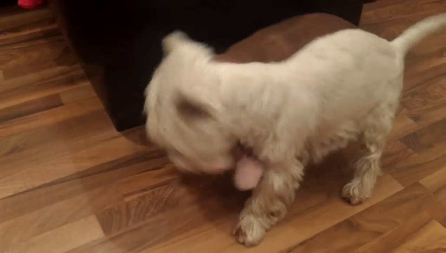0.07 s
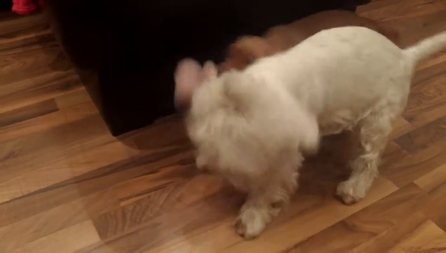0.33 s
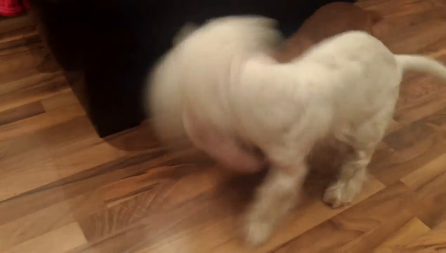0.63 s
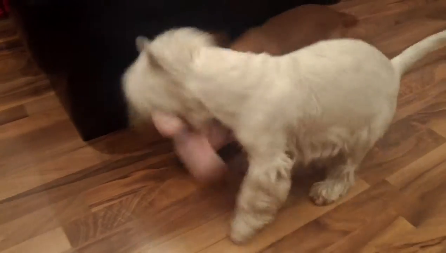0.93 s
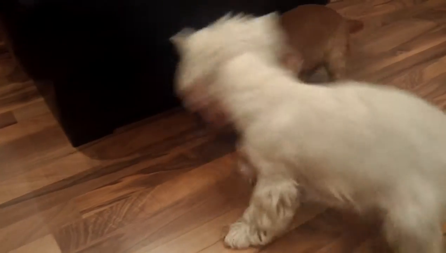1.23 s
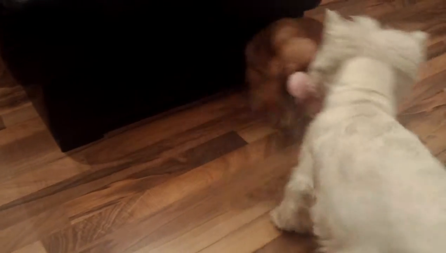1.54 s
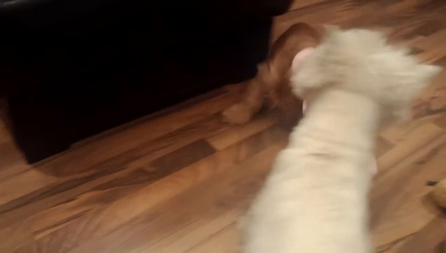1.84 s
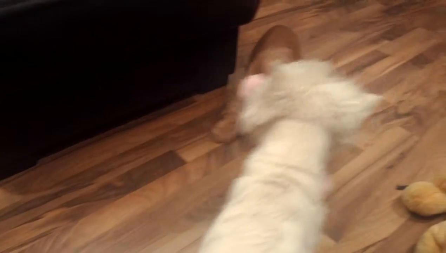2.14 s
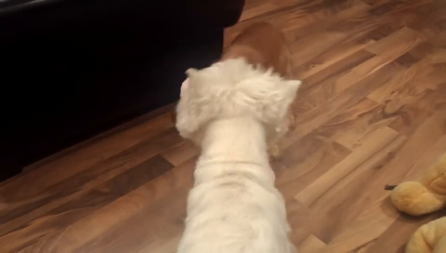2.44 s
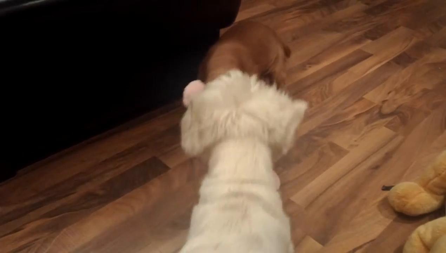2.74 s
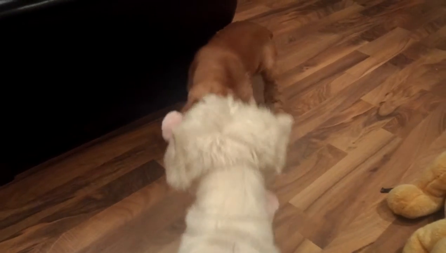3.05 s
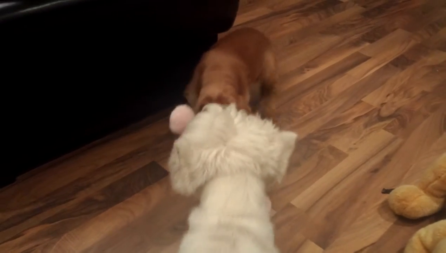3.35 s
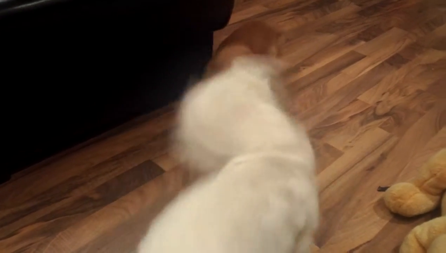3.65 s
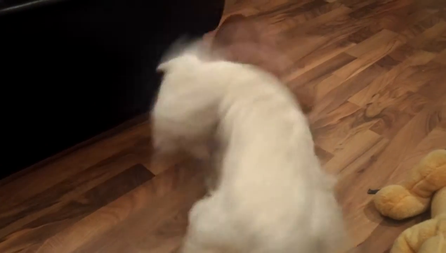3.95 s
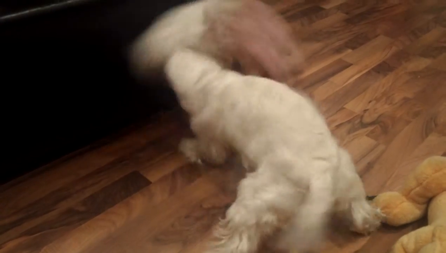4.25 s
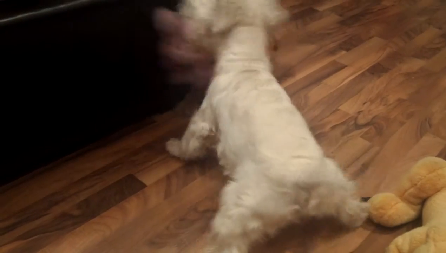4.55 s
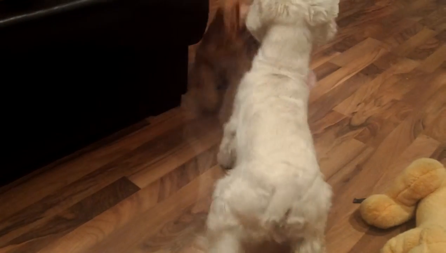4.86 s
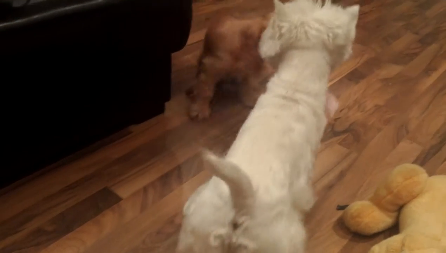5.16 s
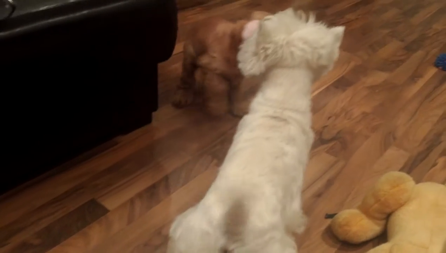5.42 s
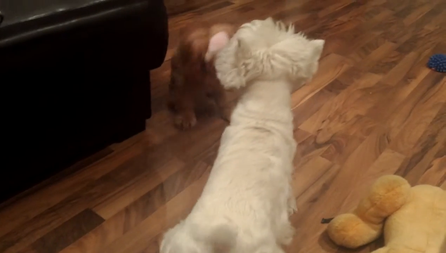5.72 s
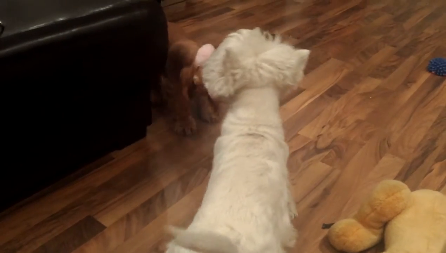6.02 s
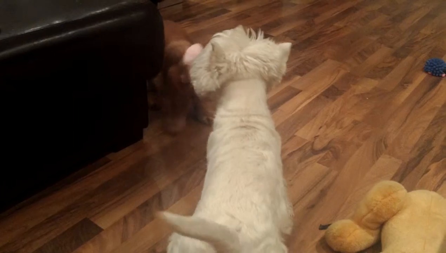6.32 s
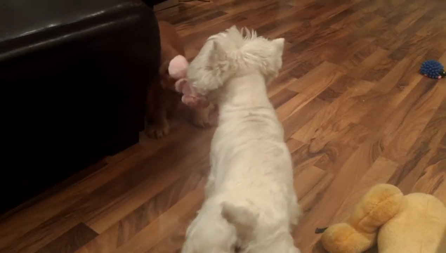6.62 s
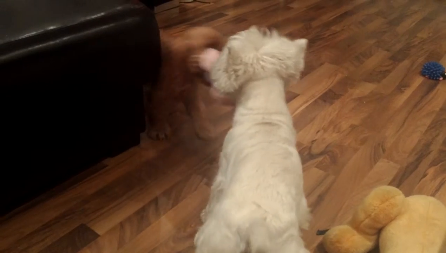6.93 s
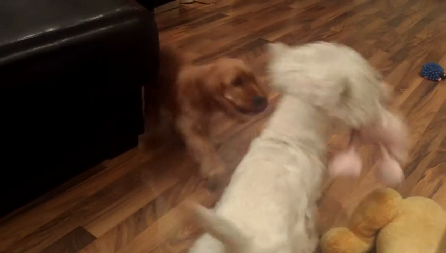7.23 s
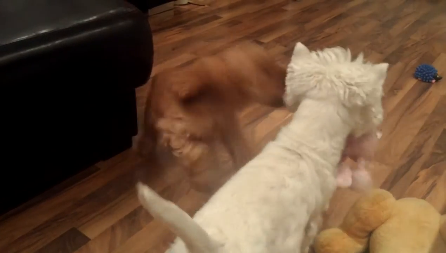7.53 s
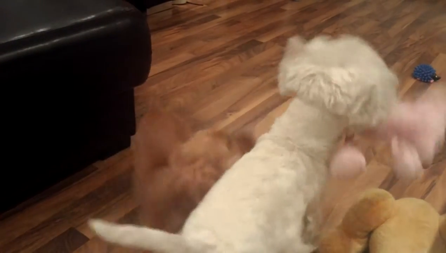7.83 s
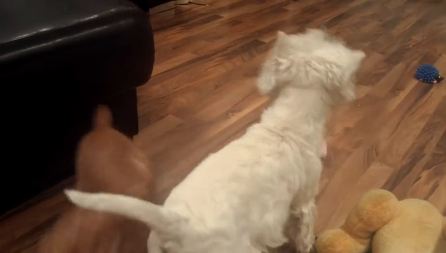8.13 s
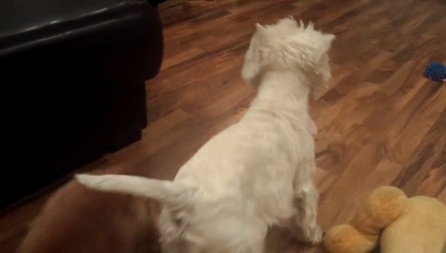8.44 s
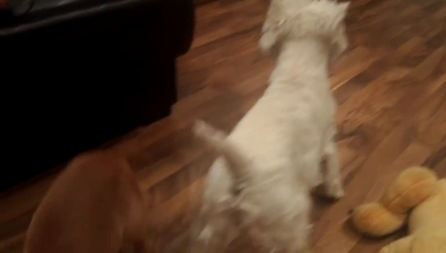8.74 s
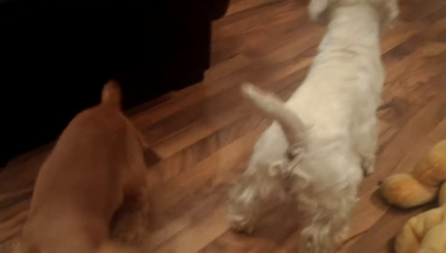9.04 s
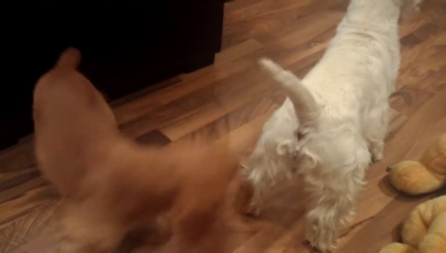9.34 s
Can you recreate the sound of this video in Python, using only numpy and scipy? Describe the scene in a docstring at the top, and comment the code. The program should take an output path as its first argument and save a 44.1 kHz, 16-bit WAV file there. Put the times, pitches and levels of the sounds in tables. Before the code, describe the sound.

Rough, wavering growls come from two small dogs play-fighting close to the microphone in a slightly echoing room. Claws tick on the laminate floor as the growling builds to snarls and a sharp bark midway, with skids and a thump. A steady low growl returns, then weaker growls trail off among paw scuffs, clicks and soft knocks, over faint background noise.

```python
"""Two small dogs tugging at a toy

Long growls break into snarls and a sharp bark: uneven vocal-fold pulses ring chest, throat and mouth,
the soft palate flutters, the nose whistles. Claws click on the laminate floor, paws and the plush toy
skid, bodies bump the boards. The bare living room rings behind it all, over faint steady noise."""
import sys
import numpy as np
from scipy import signal
from scipy.fft import rfft, irfft, next_fast_len
from scipy.io import wavfile
from scipy.ndimage import map_coordinates

SR = 44100
rng = np.random.default_rng(int(sys.argv[2]) if len(sys.argv) > 2 else 0)


def store_wav(level_fs):
    """Save 16-bit WAV to argv[1]."""
    pcm = np.round(np.clip(np.atleast_2d(level_fs), -1, 1) * 32767)
    wavfile.write(sys.argv[1], SR, pcm.T.astype(np.int16))


N = 413658

# Room decay (frequency [Hz], t60 [s])
ROOM_T60 = [(100, 0.27), (300, 0.56), (800, 0.46), (2000, 0.56), (4500, 0.63), (9000, 0.48), (14000, 0.093)]
# Spectral shapes (frequency [Hz], gain [dB])
AIR_SPECTRUM = [(15, -27.5), (25, -28), (33, -7), (66, -21), (167, -14.5), (237, -19.5), (427, -13),
                (604, -12), (1210, -11), (1460, -16), (3350, -18), (3830, -18), (4150, -19), (11800, -28),
                (15000, -37.5)]  # room background
KNOCK_SPECTRUM = [(60, -46), (150, -34), (260, -11), (420, -10.5), (560, 0.5), (730, 3), (950, -9),
                  (1350, -5.5), (2200, -11.5), (4000, -26), (9000, -37.5)]  # board under a padded blow
BOOM_SPECTRUM = [(20, -59.5), (45, -30.5), (72, -1), (88, -5.5), (120, -14.5), (220, -14.5), (400, -38),
                 (1200, -49)]  # whole floor
CLICK_SPECTRUM = [(2000, -33.5), (4000, -10.5), (6000, -13), (8000, -4.5), (9600, -5.5), (10600, -18.5),
                  (14000, -26)]  # claw
SNAP_SPECTRUM = [(500, -38.5), (3000, 13.5), (7000, -36), (11000, 2.5), (14000, 8)]  # hard claw tip
RAP_SPECTRUM = [(150, -38.5), (400, -5.5), (650, -3.5), (1100, -6.5), (1900, -4), (3000, -7), (4500, -6),
                (6500, -10.5), (10000, -38.5)]  # board under a claw
RASP_SPECTRUM = [(150, -21), (450, -21), (700, -8.5), (1300, -0.5), (2700, -6), (3500, -14), (6000, -21.5),
                 (9000, -14.5), (10800, -28), (14000, -31)]  # breath in a bark
CHEST_SPECTRUM = [(50, -43), (95, -18), (135, -11.5), (200, -3), (290, -3), (380, -5.5), (480, -7),
                  (600, -15), (800, -8), (1500, -58.5)]  # chest tone
NOSE_SPECTRUM = [(2500, -21), (4000, -12.5), (6200, -10.5), (7500, -6.5), (8400, -8.5), (9600, -0.5),
                 (10400, -18), (14000, -35)]  # nasal hiss

# Event levels are relative within each layer.
# Paws and bodies landing (time [s], knock [dB], boom [dB], boom t60 [s])
BUMPS = [(.738, -30, -72, .1), (0.978, -39.5, -65, 0.13), (3.805, -28, -59, 0.2), (3.969, -27, -49, 0.073),
         (4.371, -17.5, -29, 0.092), (4.392, -33, -62, 0.21), (4.581, -33, -50, 0.16),
         (4.787, -28, -63, 0.22), (5.068, -44.5, -67.5, 0.3), (6.215, -65, -64, 0.55),
         (7.682, -34, -80, .1), (7.755, -32, -69, .1), (8.292, -28.5, -60, .1), (8.419, -43, -66, .4),
         (8.46, -35.5, -69, 0.27), (8.58, -48.5, -73, 0.15), (8.635, -33.5, -75, .1),
         (8.905, -33, -68, 0.18), (9.06, -59, -68, 0.058)]
# Paws and toy sliding (time [s], length [s], level [dB], centre [Hz], half-width [octaves])
SCUFFS = [(0.416, 0.13, -52, 3000, .6), (0.55, 0.076, -48, 8950, 0.63), (0.69, 0.031, -36.5, 7000, 1),
          (1.964, 0.043, -37, 4030, 0.68), (3.707, 0.095, -39, 6000, 0.99),
          (3.895, 0.082, -40.5, 960, 0.41), (3.961, 0.03, -30, 7700, 0.49), (4.122, 0.06, -33, 6700, .9),
          (4.162, 0.028, -31, 3520, 0.88), (4.249, 0.11, -36.5, 4980, .79), (4.33, .054, -56, 8540, 0.33),
          (4.603, 0.096, -47, 5750, 1), (4.743, 0.033, -40, 4500, 1), (7.23, 0.073, -45, 1900, 0.79),
          (7.434, 0.059, -46, 1980, 0.55), (7.589, 0.0087, -39, 1540, 0.29), (7.737, 0.11, -44.5, 2880, 1),
          (7.939, 0.35, -52.5, 2100, 0.36), (8.337, 0.048, -37, 1740, 0.22),
          (8.64, 0.069, -41.5, 9000, 0.96), (8.756, 0.073, -43, 1650, 0.23),
          (8.843, 0.049, -40.5, 2040, 0.29)]
# Claw strikes (time [s], level [dB], rap trim [dB], snap trim [dB])
CLAWS = [(.737, -13, -17.5, -28), (0.9506, -24, -23, -28), (1.0459, -17.5, -14, -7),
         (1.0568, -25.5, -8.5, -26), (1.2182, -14.5, -17, -22.5), (1.2253, -23.5, -9.5, -23),
         (1.486, -14.5, -16.5, -32), (1.4984, -15.5, -10.5, -29), (1.8761, -30.5, -14, -28),
         (1.9581, -21, -12.5, -34), (3.8031, -10.5, -14, -4), (3.9705, -24.5, -8, -25),
         (4.2088, -10.5, -16.5, -30), (4.2917, -6, -35, -11), (4.2963, -18, -11, -9),
         (4.7258, -30, -10.5, -20), (4.7837, -24, -2, -30), (5.0643, -22.5, -26, -34),
         (7.2281, -32.5, -15, -25), (7.2467, -28.5, -23, -30), (7.4054, -26, -17.5, -56),
         (7.5675, -41, -16, -33), (7.6789, -20.5, -24, -15), (7.753, -29.5, -12, -24),
         (7.9482, -37, -5.5, -34), (8.0695, -38, -9, -5), (8.395, -32, -10.5, -30), (8.545, -35.5, -9, -33),
         (8.6353, -17, -14.5, 1), (9.055, -33.5, -37, -24.5), (9.2222, -46.5, -45.5, -28.5),
         (9.3399, -41.5, -15, -20)]
# Snarls and barks (time [s], length [s], level [dB], throat [Hz], roughness [0-1], rasp [dB])
BARKS = [(0.399, 0.022, -35, 1510, 0.8, -13), (.63, 0.014, -29.5, 1080, 0.72, -7),
         (0.712, 0.02, -32, 1090, .54, .5), (2.588, 0.028, -29, 1286, 0.3, -24),
         (2.628, 0.0077, -25.5, 1260, 0.56, -12.5), (3.712, 0.049, -23.5, 1183, 0.35, -32),
         (3.726, 0.057, -26, 831, 0.49, -6.5), (4.068, 0.022, -28, 1330, 0.62, 0.5),
         (4.11, 0.052, -17.5, 978, 0.36, -9), (4.237, .016, -16.5, 844, .15, -14),
         (4.257, 0.045, -23, 790, 0.7, -5), (4.812, .058, -25, 1670, .6, 5.5),
         (4.82, 0.07, -37.5, 2015, 0.67, 14), (5.9136, 0.0058, -21.5, 1469, 0.43, -23),
         (7.08, 0.048, -42, 1673, 0.56, -7)]
# One curve per growl (time [s], pitch [Hz], effort [dB], throat [Hz], mouth opening [0-1])
GROWLS = [
    [(0, 182.3, -39.5, 918, .3), (.05, 176, -54, 777, 0.67), (.11, 149.2, -58, 785, 1),
     (.15, 149, -74, 850, 0.5)],
    [(.235, 195, -68, 980, 0.86), (.275, 204.4, -51.5, 996, 0.92), (.36, 229.3, -46, 1125, .7),
     (.41, 245.6, -45, 928, 0.9), (.48, 276, -38.5, 998, 0.43), (.595, 251, -36.5, 848, 0.7),
     (.65, 252.7, -52, 1040, 1), (.68, 256, -60, 990, .7)],
    [(.98, 207.1, -52, 870, .2), (1.08, 262, -31, 840, 0.2), (1.15, 222, -40.5, 840, .05),
     (1.24, 200, -39, 852, 0.6), (1.34, 225.9, -42, 1138, 0.72), (1.62, 223, -44, 1318, 0.63),
     (1.82, 217, -48.5, 1040, .1), (1.97, 206.9, -46.5, 1005, 0.97), (2.2, 169.1, -37.5, 1175, 0.62),
     (2.42, 178.4, -40.5, 1126, 0.86), (2.64, 195.8, -49.5, 1296, 0.92), (2.88, 164.9, -42, 979, 0.85),
     (3.05, 153, -43.5, 1050, 0.85), (3.15, 152.1, -43, 1003, .05), (3.28, 149.1, -40.5, 1035, 0.31),
     (3.34, 150.8, -40.5, 1062, 0.9), (3.52, 160, -36.5, 1039, 0.76), (3.67, 178, -40, 1083, .68),
     (3.74, 260.4, -31, 1147, 1), (3.8, 258, -49, 986, 0.37)],
    [(4.03, 234.6, -36, 1042, 0.2), (4.1, 242.7, -33.5, 972, .7), (4.14, 262, -28, 970, 1),
     (4.2, 280, -35, 914, 0.9), (4.33, 254, -34.5, 888, 1)],
    [(4.75, 215, -54, 850, 0.36), (4.8, 235, -47.5, 900, .6), (4.83, 255, -41, 990, .8)],
    [(5.52, 140, -55, 1127, 0.1), (5.63, 142.5, -46.5, 996, 0.9), (5.68, 143.1, -40.5, 1015, 0.95),
     (5.87, 146.5, -44, 1015, 0.95), (5.93, 147.1, -41.5, 1185, 0.67), (6.03, 147.2, -40.5, 1023, 0.92),
     (6.25, 143.8, -41.5, 1035, 0.79), (6.85, 139.8, -39.5, 1041, .74), (7.11, 167.3, -43, 1025, .9),
     (7.24, 151, -69, 1110, .98)],
    [(7.85, 281.3, -64, 837, 0.6), (7.94, 265.6, -51, 890, 0.7), (8.13, 241.5, -51, 905, 0.86),
     (8.27, 205.7, -50, 852, 0.2), (8.36, 199.7, -54, 960, 1)],
    [(8.895, 245, -55, 795, .7), (8.915, 238, -41.5, 825, 0.99), (9, 215, -69, 920, 1)],
]
# Voice balance, one row per growl (chest trim [dB], nose trim [dB])
GROWL_TRIMS = [(3, -10), (-1, -9), (-3.5, -15.5), (-10.5, -21), (0, -20), (-7, -21), (-5, -13),
               (-13, -19.5)]
# Throat resonances, moving with the jaw (ratio to throat frequency [1], width [Hz], gain [dB])
THROAT_MODES = [(.74, 248, 11), (1.0, 270, 10.5), (1.17, 262, 9.5)]
# Open-mouth resonances for a 1050 Hz throat (frequency [Hz], width [Hz], gain [dB])
MOUTH_MODES = [(1550, 330, 30.5), (1685, 700, 10)]


def amp(db):
    """Decibels to gain."""
    return 10 ** (np.asarray(db) / 20)


def unit_rms(x):
    """Scale to rms 1."""
    return x / np.sqrt(np.mean(x ** 2) + 1e-20)


def lookup(table, hz):
    """Interpolate on a log-frequency axis."""
    knots_hz, values = np.transpose(table)
    return np.interp(np.log(hz + 1), np.log(knots_hz + 1), values)


def shaped(x, spectrum):
    """Filter by a spectral shape; rms 1."""
    size = next_fast_len(len(x) + 512)
    gain = amp(lookup(spectrum, np.fft.rfftfreq(size, 1 / SR)))
    return unit_rms(irfft(rfft(x, size) * gain, size)[:len(x)])


def wander(count, rate_hz):
    """Smooth random curve; rms 1."""
    knots = rng.standard_normal(2048)
    return unit_rms(map_coordinates(knots, [np.arange(count) * rate_hz / SR], order=2, mode="wrap"))


def resonate(x, hz, width_hz):
    """Gliding resonance: shift to 0 Hz, smooth twice, shift back."""
    carrier = np.exp(2j * np.pi * np.cumsum(hz * np.ones(len(x))) / SR)
    pole = np.exp(-np.pi * width_hz / SR)
    baseband = signal.lfilter([(1 - pole) ** 2], [1, -2 * pole, pole * pole], x / carrier + 1e-18)
    return 2 * (carrier * baseband).real


def highpass(x, hz, order=4):
    """Butterworth high-pass."""
    return signal.sosfilt(signal.butter(order, hz, "high", fs=SR, output="sos"), x)


def track(events):
    """Mix (start [s], sound) pairs."""
    mix = np.zeros(N)
    for start_s, sound in events:
        part = mix[max(round(start_s * SR), 0):][:len(sound)]
        part += sound[:len(part)]
    return mix


def room(x, wet_db, early_db):
    """Eight echoes off floor and sofa, plus a tail with its own decay per band."""
    size, taps_per_s = 32768, 8000
    taps = rng.choice([-1., 1.], size) * (rng.random(size) < taps_per_s / SR)
    hz, t, bands = signal.stft(taps, SR, nperseg=256)
    envelope = amp(-60 * t / lookup(ROOM_T60, hz)[:, None]) * np.minimum(t / 0.0057, 1)
    tail = signal.istft(bands * envelope, SR, nperseg=256)[1]
    response = amp(wet_db) * tail / np.linalg.norm(tail)
    response[rng.integers(60, 700, size=8)] += amp(early_db) * rng.choice([-1., 1.], size=8)
    response[0] += 1
    return signal.fftconvolve(x, response / np.linalg.norm(response))[:N]


def room_air(level_db=-68.5):
    """Faint steady rumble and hiss."""
    return amp(level_db) * shaped(rng.standard_normal(N), AIR_SPECTRUM)


def bump(start_s, knock_db, boom_db, boom_t60_s, knock_t60_s=0.055, floor_hz=86):
    """A padded blow knocks one damped board and, if heavy, shakes the whole floor."""
    t = np.arange(SR // 2) / SR
    board_noise, floor_noise = rng.standard_normal((2, len(t)))
    knock = shaped(board_noise, KNOCK_SPECTRUM) * amp(-60 * t / knock_t60_s) * (1 - np.exp(-t / 0.0016))
    lowest_mode = np.sqrt(2) * np.sin(2 * np.pi * floor_hz * t)
    boom = 0.72 * lowest_mode + 1.2 * shaped(floor_noise, BOOM_SPECTRUM)
    boom *= amp(-60 * t / boom_t60_s) * (1 - np.exp(-t / 0.003))
    return start_s, amp(knock_db) * knock + amp(boom_db) * boom


def scuff(start_s, length_s, level_db, centre_hz, half_width_oct, grain_db=5):
    """Grainy friction swells and fades with the stroke."""
    count = int(length_s * SR) + 256
    hz = np.fft.rfftfreq(count, 1 / SR)
    grains = rng.standard_normal(SR)[:count] * amp(grain_db * wander(count, 400))
    detune = np.log2((hz + 1) / centre_hz) / half_width_oct
    band = (1 + detune ** 2) ** -0.75 / np.hypot(1, (hz / 10000) ** 12)
    friction = unit_rms(irfft(rfft(grains) * band, count))
    return start_s, amp(level_db) * friction * signal.windows.tukey(count, 0.6)


def claw_strike(start_s, level_db, rap_db, snap_db, gap_s=0.0031, tick_s=0.0012, rap_decay_s=0.012):
    """Two claws tick in quick succession over one rap of the board."""
    t = np.arange(2048) / SR
    click_noise, rap_noise, tip_noise = rng.standard_normal((3, len(t)))
    age_s = np.maximum([t, t - gap_s], 0)
    first, second = (1 - np.exp(-age_s / tick_s)) * np.exp(-age_s / tick_s)
    click = shaped(click_noise, CLICK_SPECTRUM) + 0.18 * unit_rms(resonate(click_noise, 8990, 1500))
    ticks = (amp(6) * click + amp(snap_db + 5) * shaped(tip_noise, SNAP_SPECTRUM)) * (first + second)
    rap = shaped(rap_noise, RAP_SPECTRUM) * np.exp(-t / rap_decay_s)
    return start_s - 0.0005, amp(level_db) * (ticks + amp(rap_db - 1) * rap)


def vocal_folds(pitch_hz, rough, jitter, shimmer_db):
    """Uneven pulses, and a puff of air at each opening."""
    count = len(pitch_hz)
    cycles = np.cumsum(pitch_hz * (1 + jitter * rough * wander(count, 170))) / SR
    pulses = np.diff(np.floor(cycles), prepend=-1) * amp(shimmer_db * rough * wander(count, 200))
    puffs = np.exp(-(cycles % 1) / 0.58) * rng.standard_normal(count)
    return unit_rms(pulses - pulses.mean()), unit_rms(puffs)


def bark(start_s, length_s, level_db, throat_hz, rough, rasp_db, rise_s=0.0022, fall_s=0.013):
    """A sudden push of air: pitch arches, one throat resonance rings over a broad rasp."""
    t = np.arange(int((length_s + 0.056) * SR)) / SR
    arch = np.sin(np.pi * np.minimum(t / length_s, 1))
    pitch_hz = 254 * (0.94 + 0.086 * arch)
    pulses, puffs = vocal_folds(pitch_hz, rough, jitter=0.12, shimmer_db=7)
    drive = (1 - rough) * pulses + rough * puffs
    ring = unit_rms(resonate(drive, throat_hz, width_hz=330))
    rasp = amp(rasp_db) * shaped(puffs + 0.4 * pulses, RASP_SPECTRUM)
    envelope = np.minimum(t / rise_s, 1) * np.exp(-np.maximum(t - length_s + fall_s, 0) / fall_s)
    return start_s, amp(level_db) * (ring + rasp) * envelope


def nose_whistle(puffs, centre_hz=8320, width_hz=800):
    """Breath through the nose rings two wavering resonances."""
    hz = centre_hz * (1 + 0.035 * wander(len(puffs), 30))
    return unit_rms(resonate(puffs, hz, width_hz) + 0.4 * resonate(puffs, 0.89 * hz, width_hz))


def chest_tone(pulses, puffs, pitch_hz, rough):
    """Low chest resonance; the fundamental stands out when the folds run evenly."""
    hum = (1 - rough) ** 2 * unit_rms(resonate(pulses, pitch_hz, width_hz=150))
    return amp(-1) * shaped(pulses + rough * puffs, CHEST_SPECTRUM) + hum


def formants(drive, modes, scale):
    """Parallel resonances of alternating sign, frequencies times scale; rms 1."""
    return unit_rms(sum((-1) ** k * amp(gain_db) * resonate(drive, centre * scale, width_hz)
                        for k, (centre, width_hz, gain_db) in enumerate(modes)))


def vocal_tract(drive, throat_hz, opening, shut_db=-41):
    """Throat, mouth and bared teeth ring and glide together; closing lips mute all but the throat."""
    throat = unit_rms(highpass(formants(drive, THROAT_MODES, throat_hz), 560, order=8))
    mouth = formants(drive, MOUTH_MODES, (throat_hz / 1050) ** 0.25)
    teeth_hz = 2428 * (throat_hz / 1000) ** 0.97
    teeth = amp(-11.5) * unit_rms(resonate(drive, teeth_hz, width_hz=450))
    rasp = amp(-28) * unit_rms(resonate(drive, 2830, width_hz=800))
    return amp(1) * throat + amp(shut_db * (1 - opening) - 2) * (mouth + teeth + rasp)


def palate_flutter_db(push_db, start_hz=25.14, end_hz=20.31):
    """The soft palate slows as air runs out; a weak growl breaks into separate beats."""
    count = len(push_db)
    depth_db = np.clip(3.2 - 0.18 * push_db, 0, 7)
    rate_hz = np.linspace(start_hz, end_hz, count) * (1 + 0.12 * wander(count, 25))
    return depth_db * np.sin(2 * np.pi * np.cumsum(rate_hz) / SR)


def growl(curve, chest_db, nose_db, mid_pitch_hz=200, mid_throat_hz=1000, mid_effort_db=-42):
    """The folds drive tract, chest and nose; the palate beats voice and whistle in step."""
    knots_s, *columns = np.transpose(curve)
    t = np.arange(knots_s[0], knots_s[-1], 1 / SR)
    pitch_hz, effort_db, throat_hz, opening = (np.interp(t, knots_s, column) for column in columns)
    jaw_oct = np.log2(throat_hz / mid_throat_hz)  # rises as the jaw drops
    push_db = effort_db - mid_effort_db
    # Slack folds and a dropped jaw rattle.
    rough = np.clip(0.46 - 0.2 * np.log2(pitch_hz / mid_pitch_hz) + 0.55 * jaw_oct, 0, 1)
    pitch_hz *= 1 + 0.04 * rough * wander(len(t), 35.02)
    effort_db += 1.4 * wander(len(t), 12.19)  # uneven pushes of air
    pulses, puffs = vocal_folds(pitch_hz, rough, jitter=0.2, shimmer_db=7.5)
    drive = (1 - rough) * pulses + 1.27 * rough * puffs
    voice = vocal_tract(drive, throat_hz, opening)
    chest = chest_tone(pulses, puffs, pitch_hz, rough)
    chest *= amp(chest_db - 6.5 * jaw_oct - 0.085 * push_db)
    whistle = amp(-0.5) * nose_whistle(puffs)
    flutter_db = palate_flutter_db(push_db)
    nose = whistle * unit_rms(amp(1.7 * flutter_db)) + amp(-3) * shaped(puffs, NOSE_SPECTRUM)
    nose *= amp(nose_db - 23 * jaw_oct)  # an open jaw takes air from the nose
    sound = (voice + chest) * unit_rms(amp(flutter_db)) + nose
    fade = np.clip(np.minimum(t - t[0], t[-1] - t) / 0.0083, 0, 1)
    return t[0], highpass(amp(effort_db) * sound * fade, 80)


def scene():
    """Voices and footwork in the room; only the top treble flickers between left and right."""
    growls = track(growl(curve, *trims) for curve, trims in zip(GROWLS, GROWL_TRIMS))
    growls = room(growls, wet_db=-5.5, early_db=-15)
    barks = room(track(bark(*row) for row in BARKS), wet_db=-4, early_db=-27.5)
    claws, tails = np.zeros(N), 4
    for tail in range(tails):  # clicks take turns among four room tails, each ringing a little differently
        clicks = track(claw_strike(*row) for row in CLAWS[tail::tails])
        claws += room(clicks, wet_db=-6.5, early_db=-21)
    scuffs = room(track(scuff(*row) for row in SCUFFS), wet_db=-2, early_db=-11.5)
    bumps = room(track(bump(*row) for row in BUMPS), wet_db=-2.5, early_db=-29.5)
    mid = room_air() + bumps + amp(-3) * scuffs + amp(-1.5) * claws + amp(-3) * barks + growls
    side = amp(-11) * highpass(mid, 6370, order=8) * wander(N, 500)
    return np.array([mid + side, mid - side])


def record(dry):
    """Low-pass at 14.5 kHz."""
    lowpass = signal.firwin(255, 14500, window=("kaiser", 8), fs=SR)
    return signal.oaconvolve(dry, lowpass[None], "same")


dry = scene()
out = record(dry)
store_wav(out)
```